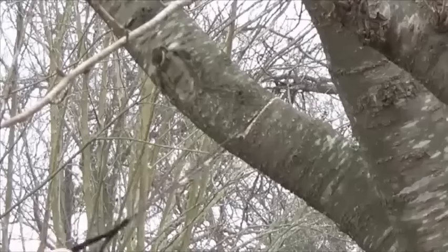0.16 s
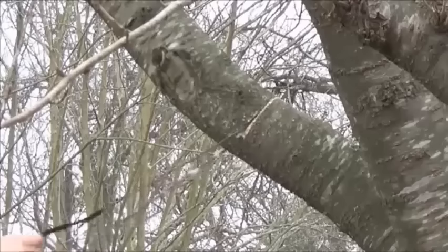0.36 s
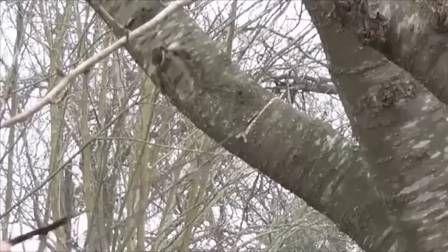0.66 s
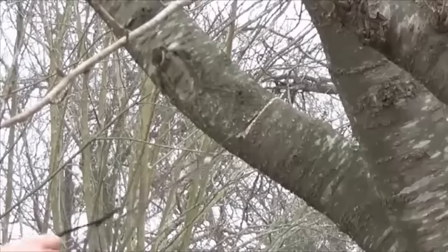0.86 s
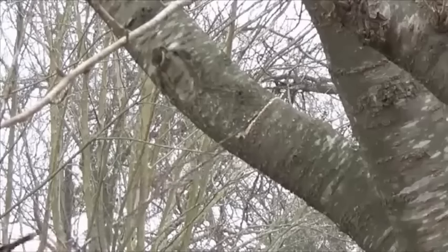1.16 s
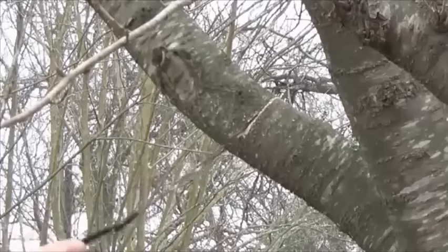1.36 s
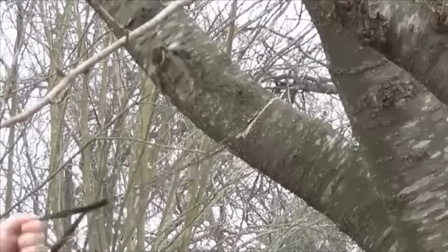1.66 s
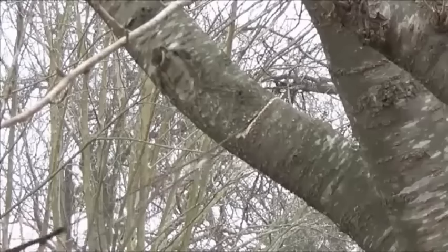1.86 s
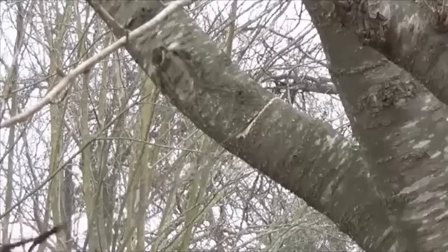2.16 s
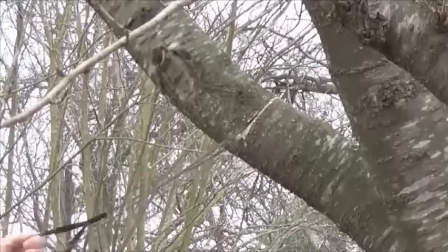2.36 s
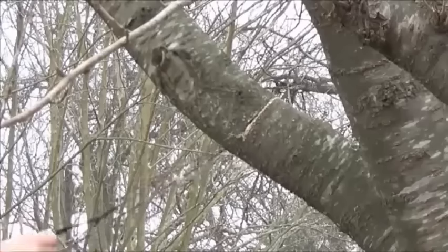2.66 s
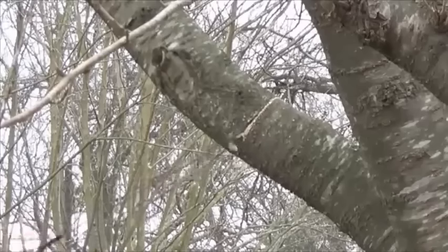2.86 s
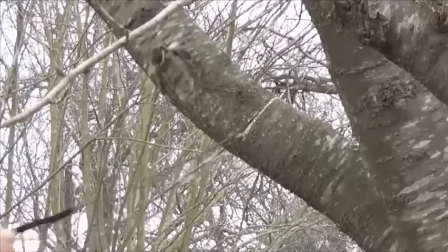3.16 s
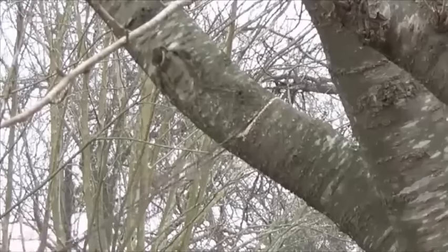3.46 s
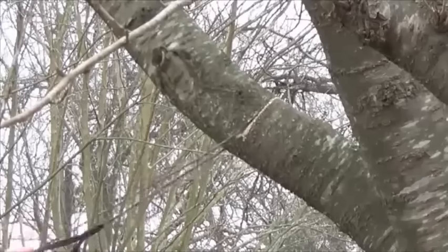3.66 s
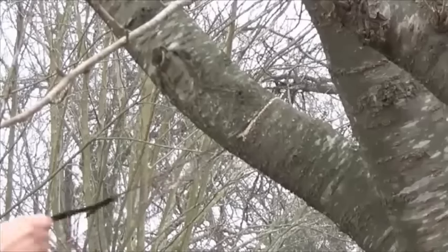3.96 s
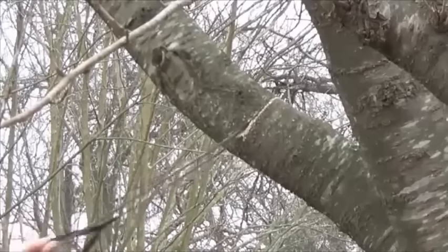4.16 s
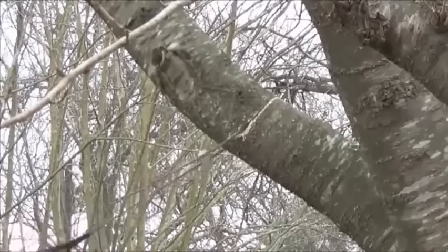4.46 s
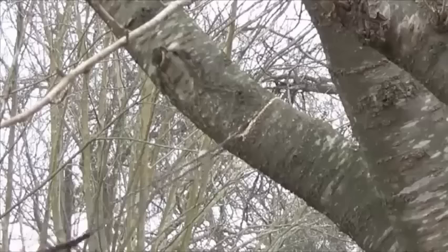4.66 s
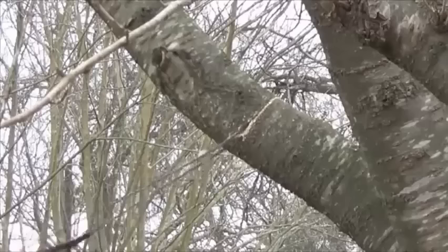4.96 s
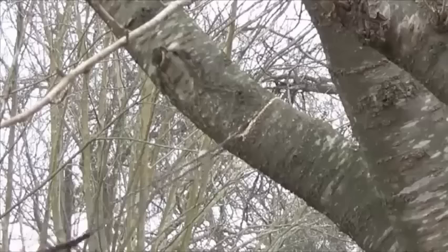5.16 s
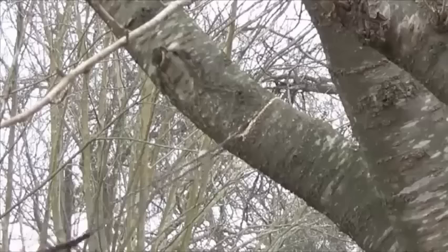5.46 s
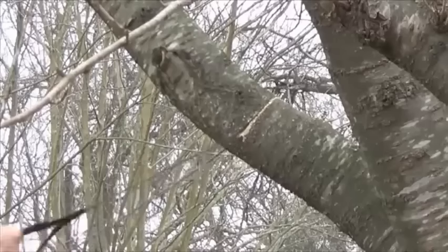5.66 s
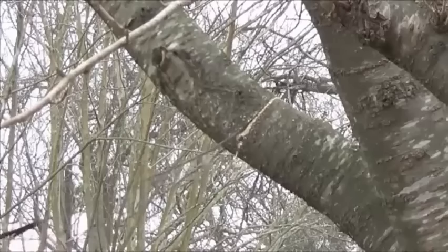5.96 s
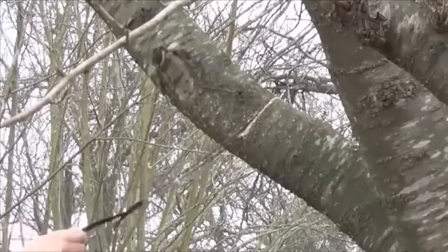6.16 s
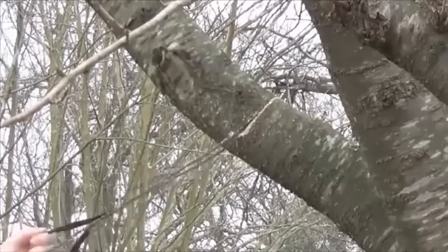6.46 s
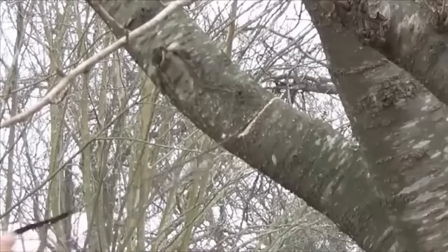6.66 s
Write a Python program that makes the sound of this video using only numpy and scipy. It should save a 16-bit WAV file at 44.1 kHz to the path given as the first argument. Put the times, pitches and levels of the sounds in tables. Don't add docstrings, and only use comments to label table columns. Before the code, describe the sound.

Close, dry outdoor sound of even hand sawing: short grating bites alternate with tiny gaps, woody and mid-pitched, with gritty tearing and a thin metallic ring. Jacket fabric swishes and snaps on every other pull. Small twig ticks and a few soft trunk bumps occur among the strokes. Far behind, low traffic and a slowly rising engine drone, with faint bird whistles. Practically mono, slightly compressed camera microphone.

```python
import sys
import numpy as np
from scipy import signal
from scipy.io import wavfile
from scipy.ndimage import uniform_filter1d

SR = 44100
rng = np.random.default_rng(int(sys.argv[2]) if len(sys.argv) > 2 else 0)


def store_pcm(level_fs):
    pcm = np.round(np.clip(level_fs, -1, 1) * 32767).astype(np.int16)
    wavfile.write(sys.argv[1], SR, np.atleast_2d(pcm).T)


def gain_from_decibels(decibels):
    exponent = np.asarray(decibels, float) / 20
    return 10 ** exponent


N = 299880
SLOW = np.arange(0, N, 32)
SLOW_S = SLOW / SR


def evened(x):
    return x / np.sqrt(np.mean(x ** 2) + 1e-20)


def curves(rows):
    s, *columns = np.transpose(rows)
    return [np.interp(np.arange(N) / SR, s, column) for column in columns]


def ring(x, modes):
    out = np.zeros(len(x))
    for k, (hz, width_hz, db) in enumerate(modes):
        radius = np.exp(-np.pi * width_hz / SR)
        pole = radius * np.exp(2j * np.pi * hz / SR)
        mode = 2 * signal.lfilter([1 - radius], [1, -pole], x).real
        out += (-1) ** k * gain_from_decibels(db) * mode
    return out


def colour(x, points):
    hz, db = np.transpose(points)
    bins_hz = np.fft.rfftfreq(8192, 1 / SR)
    log_gain = np.interp(np.log(bins_hz + 1), np.log(hz), db) * np.log(10) / 20
    gain = np.exp(np.conj(signal.hilbert(np.r_[log_gain, log_gain[-2:0:-1]])))
    return signal.oaconvolve(x, np.fft.ifft(gain).real[:4096])[:len(x)]


def flutter(seconds):
    size = max(round(seconds * SR), 1)
    smooth = uniform_filter1d(rng.standard_normal(N), size)
    return evened(uniform_filter1d(smooth, size))


def grains(per_s, spread_db):
    size = gain_from_decibels(spread_db * np.minimum(rng.exponential(1, N), 3.2))
    sign = rng.choice([-1., 1.], N)
    return evened(size * sign * (rng.random(N) < per_s / SR))


def patchy(x, patch_db):
    hz, _, z = signal.stft(x, SR, nperseg=256)
    patches = uniform_filter1d(rng.standard_normal(z.shape), 5, 0)
    patches = evened(uniform_filter1d(patches, 9, 1))
    z = z * gain_from_decibels(patch_db * patches * (hz[:, None] > 600))
    return evened(signal.istft(z, nperseg=256)[1][:N])


def bells(rows, span_s):
    s, *change_db = np.transpose(rows)
    return np.array(change_db) @ np.exp(-((SLOW_S - s[:, None]) / span_s) ** 2)


def moments(rows, span_s):
    return [np.interp(np.arange(N), SLOW, row) for row in bells(rows, span_s)]


def held(start, length, rise, fall):
    start, length = start[:, None], length[:, None]
    before = np.maximum(start - SLOW_S, 0)
    after = np.maximum(SLOW_S - start - length, 0)
    return -rise * before - fall * after, (SLOW_S - start) / length


def joined(rows_db, rest_db):
    power = (gain_from_decibels(rows_db) ** 2).sum(0) + gain_from_decibels(rest_db) ** 2
    return np.interp(np.arange(N), SLOW, 10 * np.log10(power))


# pitch_hz, density_db [dB per Hz]
AIR = [(15, -48), (25, -6.5), (107, 7), (314, 9), (538, 2.5), (827, -10.5), (972, -11.5), (1170, -20),
       (1660, -7.5), (1850, -11.5), (2850, -14.5), (3350, -12.5), (3940, -24.5), (11500, -45), (13700, -25),
       (15500, -22)]
# time_s, rumble_change_db
ROAD = [(0, 2), (.6, -2), (1.15, -4), (1.9, 2), (2.4, 1), (3.1, -3), (3.5, 2), (4.2, 4), (4.7, 4), (5.2, 1),
        (5.8, -3), (6.3, -8), (6.7, 0)]


def road():
    hum = patchy(colour(rng.standard_normal(N), AIR), 2.5)
    hum = gain_from_decibels(-34 + 1.9 * flutter(.1)) * hum
    rumble = signal.sosfiltfilt(signal.butter(2, 120, fs=SR, output="sos"), hum)
    return hum + (gain_from_decibels(curves(ROAD)[0]) - 1) * rumble


# time_s, drone_hz, level_db, octave_level_db
ENGINE = [(0, 114, -47.5, -58), (.5, 117, -42, -56), (.85, 119, -59, -58), (1.15, 121, -40.5, -51),
          (1.9, 126, -39.5, -62), (2.6, 129, -44.5, -54), (3.2, 131.5, -44, -47), (3.8, 134.5, -38, -50),
          (4.05, 135.5, -46, -36), (4.5, 137.5, -40, -36), (5.0, 140, -42.5, -39), (5.3, 139, -42.5, -48),
          (5.5, 138, -64, -61)]


def engine():
    hz, db, octave_db = curves(ENGINE)
    turn = 2 * np.pi * np.cumsum(hz) / SR
    drone = gain_from_decibels(db + 0.88 * flutter(0.13)) * np.sin(turn)
    octave = gain_from_decibels(octave_db - 2.5 + 3.5 * flutter(0.08)) * np.sin(2 * turn)
    return np.sqrt(2) * (drone + octave)


# time_s, pitch_hz, level_db
BIRD = [
    [(5.29, 2070, -50), (5.32, 2130, -38), (5.37, 2240, -39), (5.44, 2490, -43), (5.52, 2840, -34),
     (5.6, 3060, -40), (5.66, 3230, -38), (5.73, 3410, -41), (5.76, 3490, -56)],
    [(2.08, 2230, -52), (2.12, 2270, -42), (2.17, 2320, -45), (2.22, 2425, -42), (2.27, 2390, -47)],
    [(4.52, 2900, -50), (4.56, 3000, -43), (4.62, 3150, -48)],
    [(5.62, 4650, -46), (5.645, 4620, -41), (5.68, 4600, -43), (5.7, 4560, -54)],
]


def bird():
    out = np.zeros(N)
    for rows in BIRD:
        (first_s, first_hz, _), (last_s, last_hz, _) = rows[0], rows[-1]
        fade_in, fade_out = (first_s - .02, first_hz, -90), (last_s + .02, last_hz, -90)
        hz, db = curves([fade_in, *rows, fade_out])
        turn = 2 * np.pi * np.cumsum(hz + 10.5 * flutter(0.0111)) / SR
        out += np.sqrt(2) * gain_from_decibels(db + 1.0 + 2.1 * flutter(0.015)) * np.sin(turn)
    return out


# time_s, level_db, pitch_hz, length_s
THUDS = [
    (1.58, -33, 75, .06),
    (1.99, -31, 110, .05),
    (2.065, -24, 100, .06),
    (3.56, -33, 70, .04),
    (4.26, -31, 180, .05),
]


def thuds():
    t, out = np.arange(N) / SR, np.zeros(N)
    for s, db, hz, length in THUDS:
        bell = np.exp(-(2 * (t - s) / length) ** 2)
        out += gain_from_decibels(db) * bell * np.sin(2 * np.pi * hz * (t - s))
    return out


# time_s, peak_db, pitch_hz, decay_s, crack_share [0-1]
TICKS = [(1.963, -14, 3040, 0.003, 0.4), (1.992, -18, 8000, 0.0035, .9), (2.91, -18.5, 5200, 0.0066, .8),
         (3.205, -20, 8000, 0.011, .95), (3.246, -14.5, 7100, .007, 0.8), (3.5269, -8, 1100, 0.0033, 0.2),
         (3.5515, -14.5, 3600, .005, .8), (3.553, -19, 9000, .003, 0.96), (4.584, -22, 8400, 0.0046, .9),
         (4.9845, -27, 1540, .006, 0.2), (5.342, -13, 5100, .004, .1), (6.732, -9.5, 4900, 0.0021, .7),
         (6.773, -17, 3940, 0.0061, .8)]


def twigs():
    t, out = np.arange(1000) / SR, np.zeros(N)
    band = signal.butter(4, [1200, 12500], "band", fs=SR)
    cracks = signal.lfilter(*band, rng.standard_normal((len(TICKS), 1000)))
    for (s, db, hz, decay_s, crack), noise in zip(TICKS, cracks):
        tick = (1 - crack) * np.sin(2 * np.pi * hz * t) + crack * 0.89 * noise
        out[round(s * SR):][:1000] += gain_from_decibels(db - 30 * t / decay_s) * tick
    return out


# time_s, peak_db, rise_s, fall_s [both over 20 dB]
SWEEPS = [(-0.002, -17.3, 0.05, 0.09), (0.272, -24.5, 0.039, 0.052), (0.379, -36.3, 0.02, 0.02),
          (0.627, -16.4, 0.058, 0.058), (0.863, -29.6, 0.062, 0.02), (1.194, -18.4, 0.03, 0.108),
          (1.471, -30.5, 0.086, 0.142), (1.814, -15.4, 0.044, 0.068), (2.076, -32.3, 0.12, 0.02),
          (2.437, -16.9, 0.067, 0.092), (2.804, -24.7, 0.02, 0.02), (3.067, -15.3, 0.062, 0.072),
          (3.411, -27.6, 0.172, 0.02), (3.639, -14.0, 0.021, 0.097), (3.72, -20.3, 0.081, 0.023),
          (4.145, -33.2, 0.055, 0.02), (4.235, -25.0, 0.037, 0.032), (4.329, -14.2, 0.03, 0.101),
          (4.482, -19.6, 0.051, 0.019), (4.822, -25.3, 0.035, 0.079), (5.044, -24.4, 0.042, 0.021),
          (5.144, -12.2, 0.029, 0.079), (5.271, -23.7, 0.049, 0.02), (5.602, -23.5, 0.117, 0.031),
          (5.865, -15.5, 0.045, 0.066), (5.986, -18.7, 0.036, 0.02), (6.302, -25.1, 0.268, 0.052),
          (6.493, -22.2, 0.063, 0.019), (6.588, -15.3, 0.041, 0.046), (6.806, -26.9, 0.033, 0.05)]


def sweeps():
    s, db, rise, fall = np.transpose(SWEEPS)[:, :, None]
    past = SLOW_S - s
    away = np.minimum(abs(past) / np.where(past < 0, rise, fall), 3)
    return joined(db - 20 * away ** 2.18, -90)


# pitch_hz, density_db [dB per Hz]
SWISH = [(2500, -23), (5000, -14), (7000, -7), (9500, -2), (11300, 2), (12500, -5), (13400, -8.5),
         (13750, -15.5), (15100, -9), (15700, -16)]
# time_s, change_db
FLICKS = [(0.17, 4.7), (0.49, 4.5), (0.54, -2.8), (0.75, -3.1), (1.0, -4.3), (1.41, -3.1), (1.48, -3.6),
          (1.61, -4.3), (1.73, 2.7), (1.76, -7.4), (2.11, 2.9), (2.85, 3.2), (2.98, -2.7), (3.0, -3.2),
          (3.24, -2.7), (3.27, 3.2), (3.55, -5.8), (3.61, -4.3), (3.65, 2.7), (3.77, -4.2), (3.86, 5.4),
          (3.93, 3.0), (4.01, 2.8), (4.27, -3.6), (4.51, -3.1), (4.7, 3.4), (5.08, -2.8), (5.1, -4.8),
          (5.32, 2.9), (5.42, -2.9), (5.47, 3.0), (5.49, -2.8), (5.55, 2.8), (5.65, -2.7), (5.76, 3.6),
          (5.79, -3.0), (6.11, 5.0), (6.14, 6.3), (6.19, -4.6), (6.46, 2.7), (6.51, -3.0), (6.62, -3.2),
          (6.72, -2.6), (6.74, 3.0), (6.78, -4.3)]


def sleeve():
    rub = colour(grains(14000, 3.0) * gain_from_decibels(3.0 * flutter(0.0033)), SWISH)
    brush_db = slide()[2]
    level = np.hypot(gain_from_decibels(brush_db), gain_from_decibels(sweeps() - .4))
    return level * gain_from_decibels(moments(FLICKS, .012)[0]) * patchy(rub, 1.3)


# time_s, peak_db
SNAPS = [(1.1804, -9), (1.7903, -5), (2.4039, -8), (3.0111, -10), (3.0435, -6), (3.0839, -5), (3.6237, -6),
         (3.6471, -3), (3.6884, -2), (4.3181, -4), (5.1407, -3), (5.5707, -9), (5.8521, -4), (6.134, -13),
         (6.5829, -2)]


def snaps():
    clicks = np.zeros(N)
    for s, db in SNAPS:
        clicks[round(s * SR)] = gain_from_decibels(db - 2.5)
    one_click = 1. * (np.arange(64) == 0)
    return colour(clicks, SWISH) / abs(colour(one_click, SWISH)).max()


# time_s, peak_db, link_ring_db [above the peak]
CATCHES = [(0.032, -14, -15), (0.85, -17.5, -11), (0.987, -9.5, -17), (1.756, -10.5, -16),
           (1.878, -10.5, -14), (2.472, -13, -15), (2.492, -6, -21), (2.988, -20, -1), (3.109, -8, -20),
           (3.145, -25, -18), (3.586, -15, -4), (3.903, -9, 6.5), (3.992, -7.5, -16), (4.646, -11, -15),
           (4.71, -11, -18), (4.771, -12, -10), (5.112, -21, -10), (5.188, -18, -16), (5.502, -13, -11),
           (5.572, -11, -18), (6.097, -8, -9), (6.153, -15, -12), (6.489, -10, -11), (6.618, -10, -19)]


def catches():
    t, out = np.arange(2000) / SR, np.zeros(N + 2000)
    push = -np.exp(-t / 0.00025) * t
    knock, clink = ring(push, LIMB), ring(1. * (t == 0), LINKS)
    knock, clink = knock / abs(knock).max(), clink / abs(clink).max()
    for s, db, clink_db in CATCHES:
        out[round(s * SR):][:2000] += gain_from_decibels(db + 1.0) * (knock + gain_from_decibels(clink_db - 9.0) * clink)
    return out[:N]


# time_s, bite_change_db, link_ring_change_db
JERKS = [(1.18, 2.0, 5.5), (1.368, 5.2, -2.5), (1.425, -5.3, -4.5), (1.587, -4.8, -6.2), (1.716, 2.6, 7.2),
         (2.072, -4.5, 4.2), (2.409, 1.6, 6.9), (2.492, 1.9, -7.0), (2.527, -5.2, 6.4), (3.099, -5.2, 5.0),
         (3.52, 4.7, 3.7), (3.552, 3.1, 6.8), (3.613, -2.4, -6.6), (3.644, 0.9, 7.1), (3.683, -2.4, -8.2),
         (3.768, -3.6, 4.0), (4.048, 2.8, -7.5), (4.236, -4.8, 5.0), (4.64, -1.1, -7.5), (4.848, -5.3, 2.8),
         (5.116, 3.7, -8.1), (5.163, -7.3, 1.9), (5.211, 2.8, -5.5), (5.504, 2.8, 5.7), (5.556, 0.8, -8.3),
         (5.896, -1.6, -7.1), (6.115, -2.9, 5.2), (6.328, -3.3, 5.6), (6.456, 6.0, 1.0),
         (6.508, -3.6, -5.6)]


def jerks():
    return bells(JERKS, .014)


# start_s, length_s, tearing_db, change_over_pull_db, drag_after_db [below it]
CUT = [(0.006, 0.144, -30.3, -1.6, -7.8), (0.23, 0.233, -23.8, -12.2, -5.8),
       (0.548, 0.182, -22.6, -8.3, -11.4), (0.826, 0.183, -30.4, -2.7, -12.9),
       (1.139, 0.168, -33.4, 3.2, -9.8), (1.422, 0.188, -29.4, -3.4, -9.8),
       (1.75, 0.157, -28.4, -0.2, -9.0), (2.024, 0.201, -27.4, -2.0, -12.2),
       (2.355, 0.193, -29.9, 1.0, -9.7), (2.666, 0.19, -24.7, -6.4, -9.3),
       (3.002, 0.167, -25.4, -5.5, -13.9), (3.273, 0.182, -28.9, -1.0, -8.3),
       (3.596, 0.174, -27.3, -0.3, -12.5), (3.884, 0.209, -27.6, -0.3, -8.3),
       (4.279, 0.205, -26.9, 0.3, -12.2), (4.625, 0.251, -26.4, -2.4, -9.2),
       (5.074, 0.214, -30.5, 5.1, -8.4), (5.401, 0.227, -28.0, 2.9, -7.7),
       (5.787, 0.202, -29.6, 4.3, -12.0), (6.109, 0.224, -29.4, 4.6, -11.7),
       (6.476, 0.217, -29.0, 0.9, -6.7), (6.807, 0.168, -26.0, -2.8, -12.7)]
# time_s, lift_db, length_s
RIPS = [
    (.28, 4, .03),
    (.6, 1.5, .03),
    (2.68, 2, .02),
    (3.645, 4, .02),
    (4.33, 3, .02),
    (5.52, 2, .03),
    (6.31, 2, .02),
]


def slide():
    start, length, db, change_db, drag_db = np.transpose(CUT)
    db, change_db = db[:, None], change_db[:, None]
    gate, done = held(start, length, 400, 400)
    drag = drag_db[:, None] + held(start, length, 400, 43)[0]
    gate = 20 * np.log10(np.hypot(gain_from_decibels(gate), gain_from_decibels(drag)) + 1e-15)
    rips_db = sum(lift * np.exp(-((SLOW_S - s) / span) ** 2) for s, lift, span in RIPS)
    middle_db = db + change_db / 2
    tear_db = db + change_db * np.clip(done, 0, 1) + gate + rips_db
    link_db = .55 * (middle_db + 28) - 32.8 + 1.66 * gate + jerks()[1]
    brush_db = middle_db - 3.2 + 1.55 * gate
    return joined(tear_db, -41.5), joined(link_db, -57.5), joined(brush_db, -47.7)


# start_s, length_s, hardest_place [0-1], bite_db, deep_part_db [below the whole]
BITES = [(-0.039, 0.141, 0.66, -19.9, -3.5), (0.212, 0.187, 0.81, -20.0, -4.6),
         (0.552, 0.17, 0.56, -18.7, -3.3), (0.852, 0.148, 0.84, -20.4, -2.1),
         (1.142, 0.145, 0.79, -19.7, -2.8), (1.434, 0.178, 0.48, -18.8, -2.6),
         (1.753, 0.155, 0.07, -17.6, -4.2), (2.029, 0.17, 0.71, -20.0, -3.5),
         (2.36, 0.192, 0.63, -18.8, -3.7), (2.667, 0.183, 0.9, -18.5, -3.3),
         (2.997, 0.17, 0.62, -16.5, -2.5), (3.289, 0.177, 0.64, -18.0, -3.1),
         (3.612, 0.15, 0.25, -16.0, -3.6), (3.897, 0.173, 0.65, -16.5, -2.1),
         (4.225, 0.269, 0.61, -16.7, -2.9), (4.641, 0.23, 0.56, -16.7, -2.5),
         (5.041, 0.244, 0.64, -15.9, -2.6), (5.402, 0.213, 0.73, -17.1, -2.8),
         (5.784, 0.194, 0.72, -14.1, -3.3), (6.102, 0.209, 0.67, -15.1, -4.2),
         (6.489, 0.219, 0.25, -15.3, -3.5), (6.801, 0.1, 0.5, -22.1, -2.8)]


def bite():
    start, length, place, db, deep_db = np.transpose(BITES)[:, :, None]
    gate, done = held(start[:, 0], length[:, 0], 417, 363)
    past = (done - place) * length
    off_peak_db = np.where(past < 0, -50 * past, 52 * past)
    rows_db = db + gate - off_peak_db + jerks()[0]
    whole_db = joined(rows_db, -36)
    return whole_db, joined(rows_db + deep_db, -46) - whole_db


# pitch_hz, width_hz, level_db
LIMB = [(268.4, 46, -7.5), (349.2, 51, 0), (400.8, 46.7, 2.5), (505.6, 48, -2), (568, 18.3, 0.5),
        (637.7, 59, -2), (735, 96, -2), (818, 110, -7.5), (1015, 65, -12.5), (1302, 50, -12)]
# time_s, deep_change_db, upper_change_db
KNOCK_CHANGES = [(0.03, 5.0, -0.8), (0.31, -6.8, -1.0), (0.39, 4.6, -3.0), (0.62, -4.0, -4.6), (0.66, 4.7, -1.2),
                 (0.71, -5.0, 2.6), (1.16, -1.6, 5.3), (1.2, -2.3, -5.0), (1.24, 4.7, -2.2), (1.3, 5.7, -2.4),
                 (1.47, 3.3, 1.9), (1.51, 5.9, -2.5), (1.6, 4.1, -1.0), (1.74, -3.7, 2.1), (1.77, -3.9, 3.8),
                 (1.82, -4.0, -2.3), (2.09, -2.1, 5.4), (2.14, 6.3, 2.4), (2.36, -1.0, 4.7), (2.69, 6.4, 2.9),
                 (2.77, -4.6, -3.9), (3.01, -5.1, -0.1), (3.04, 3.1, 5.1), (3.15, 8.0, -2.9), (3.32, -3.6, 2.2),
                 (3.35, 4.0, -2.4), (3.39, 4.4, 0.3), (3.44, -7.0, -0.9), (3.6, -1.9, 4.5), (3.75, 2.6, 3.0),
                 (3.94, -6.9, -1.6), (4.04, 3.7, -1.6), (4.07, -3.7, -1.2), (4.25, -5.6, 4.3), (4.3, 0.6, 6.0),
                 (4.35, -2.5, -5.6), (4.42, -1.1, -3.9), (4.45, -4.2, 1.1), (4.5, 3.8, 0.9), (4.78, 2.4, -3.9),
                 (4.81, 6.3, 0.7), (4.86, -3.8, 1.4), (5.03, -7.1, 1.3), (5.13, 7.7, -0.2), (5.28, -4.8, -0.7),
                 (5.41, -2.7, 5.5), (5.46, -5.2, -0.1), (5.51, 3.6, -2.0), (5.54, 0.8, -4.8), (5.58, -2.1, 3.9),
                 (5.64, 4.8, -0.3), (5.8, -4.1, -2.7), (5.92, 4.0, -0.7), (6.13, 5.3, 1.6), (6.19, -1.5, -4.3),
                 (6.24, -4.7, -2.2), (6.3, -4.1, -3.0), (6.33, -4.4, 1.1), (6.51, -4.0, 1.8), (6.66, -4.9, -3.7)]


def limb(grip):
    bite_db, deep_db = bite()
    deep = np.clip(gain_from_decibels(deep_db), 0, .97)
    band = signal.butter(2, [230, 1200], "band", fs=SR, output="sos")
    knocks = signal.sosfilt(band, grains(3000, 0.76))
    low_db, high_db = moments(KNOCK_CHANGES, .014)
    low = 1.04 * deep * gain_from_decibels(low_db) * evened(ring(knocks, LIMB[:3]))
    high = .93 * np.sqrt(1 - deep ** 2) * gain_from_decibels(high_db) * evened(ring(knocks, LIMB[3:]))
    return gain_from_decibels(bite_db + 0.72 * grip) * (low - high)


# pitch_hz, width_hz, level_db
LINKS = [(3343, 260, -7), (3525, 170, 1.5), (4930, 140, -3), (4370, 530, -14.5), (4885, 60, -6),
         (3545, 75, -2.5)]
# time_s, link_ring_change_db
RING_CHANGES = [(0.14, -8.0), (0.25, -4.5), (0.37, -8.0), (0.45, -5.6), (0.55, -6.1), (0.6, 3.9), (0.7, -5.3),
                (0.84, -4.1), (0.89, -4.7), (0.93, -5.1), (1.01, -5.2), (1.14, -6.6), (1.24, -6.3), (1.27, -5.6),
                (1.32, -6.3), (1.49, 5.6), (1.75, -7.6), (1.78, 4.7), (1.87, 5.7), (1.91, -5.2), (2.37, -4.7),
                (2.8, -8.0), (2.99, 6.7), (3.04, 4.1), (3.18, -5.5), (3.28, -5.6), (3.33, -4.9), (3.42, -5.1),
                (3.59, 8.0), (3.87, -4.2), (4.32, 6.6), (4.36, 4.4), (4.42, 6.9), (4.46, 4.5), (4.72, -6.1),
                (4.87, -4.4), (5.11, -5.9), (5.26, 5.9), (5.52, 5.4), (5.63, 5.4), (5.92, -3.9), (5.97, 4.6),
                (6.3, 5.5), (6.64, -7.0), (6.7, -3.9)]


def links(grip):
    shaken = patchy(ring(grains(1500, 2.5), LINKS), 2.2)
    return gain_from_decibels(slide()[1] + moments(RING_CHANGES, .016)[0] + 1.0 + 1.9 * grip) * shaken


# pitch_hz, density_db [dB per Hz]
TEARING = [(700, -15.5), (1100, -4), (1600, -5), (2500, -2), (4000, -3), (5200, -5.5), (5600, -5),
           (8000, -4), (15000, -33)]


def fibres(grip):
    torn = colour(grains(9000, 3.7) * gain_from_decibels(0.75 * grip), TEARING)
    return gain_from_decibels(slide()[0] - 0.6) * patchy(torn, 1.54)


def saw():
    grip = flutter(0.0016)
    return limb(grip) + links(grip) + fibres(grip)


def scene():
    far = road() + engine() + bird()
    near = thuds() + twigs() + sleeve() + snaps() + catches() + saw()
    return np.tile(far + near, (2, 1))


def strong_lines(x, size=1024):
    n, k = np.arange(2 * size)[:, None] + .5, np.arange(size * 5 // 8) + .5
    window = np.sqrt(2 / size) * np.sin(np.pi * n / size / 2)
    basis = window * np.cos(np.pi / size * (n + size / 2) * k)
    blocks = np.r_[x, np.zeros(2 * size - N % size)].reshape(-1, size)
    lines = np.hstack([blocks[:-1], blocks[1:]]) @ basis
    line_hz = k * SR / size / 2
    coarse = np.interp(line_hz, [1200, 2000, 9000, 9800, 13400, 13500], [.05, 1.5, 1.7, 2.5, 3.0, .05])
    step = coarse * np.sqrt(uniform_filter1d(lines ** 2, 20, 1) + 1e-16)
    error = (step * np.round(lines / step) - lines) @ basis.T
    blocks[:-1] += error[:, :size]
    blocks[1:] += error[:, size:]
    return blocks.ravel()[:N]


def band_limit(x):
    return signal.sosfilt(signal.butter(12, 15690, fs=SR, output="sos"), x)


def record(dry):
    mono = 1.058 * np.tanh(strong_lines(dry[0]) / 1.133)
    band_edge = signal.firwin(801, 15720, window=("kaiser", 8), fs=SR)
    mono = signal.oaconvolve(mono, band_edge, "same")
    trace = gain_from_decibels(-33) * ring(np.roll(mono, 37), [(90, 94, -5.5), (900, 460, 0.5), (4600, 1600, -1.5)])
    return band_limit(mono + np.outer([1, -1], trace))


dry = scene()
out = record(dry)
store_pcm(out)
```